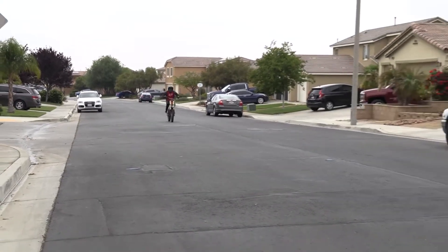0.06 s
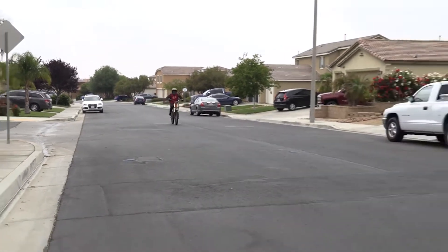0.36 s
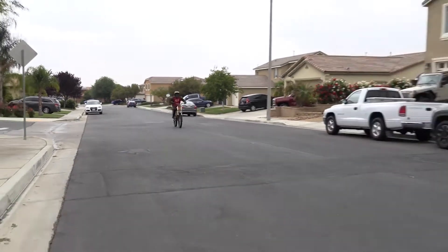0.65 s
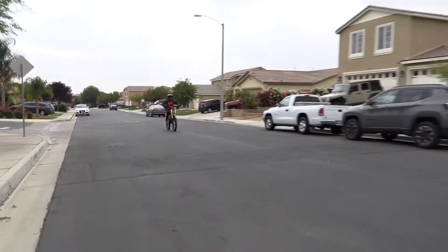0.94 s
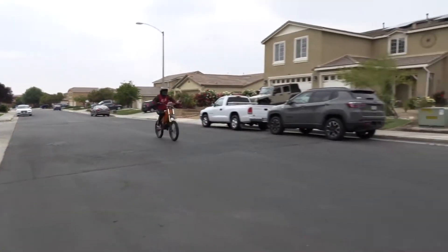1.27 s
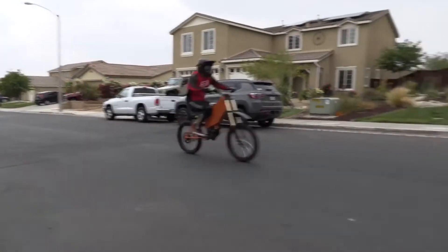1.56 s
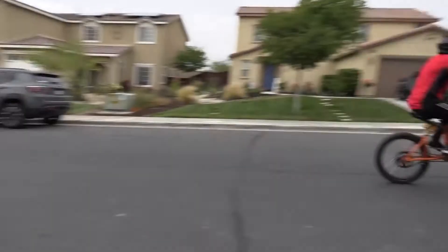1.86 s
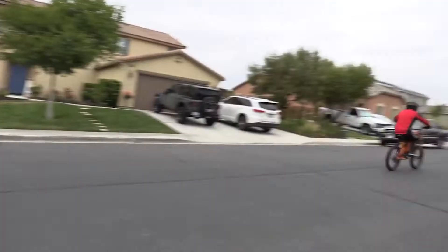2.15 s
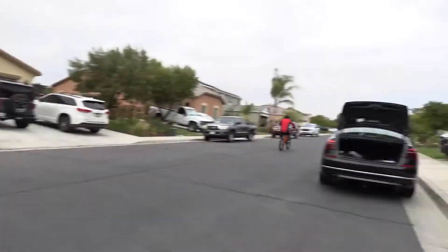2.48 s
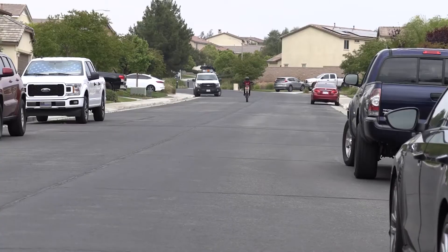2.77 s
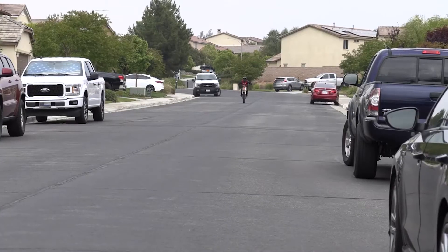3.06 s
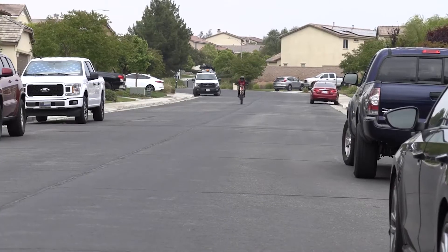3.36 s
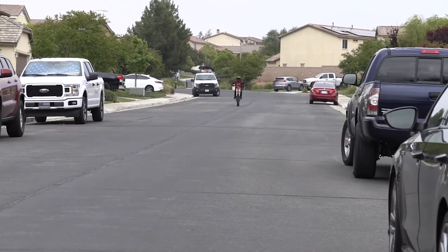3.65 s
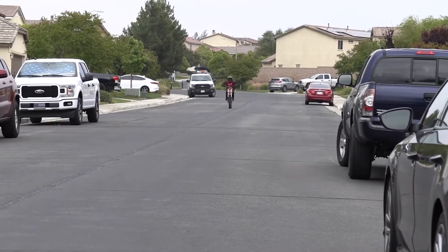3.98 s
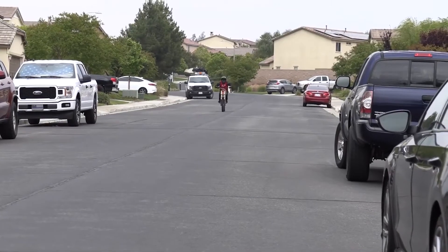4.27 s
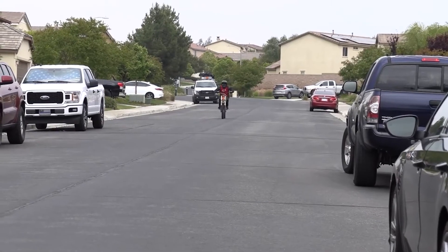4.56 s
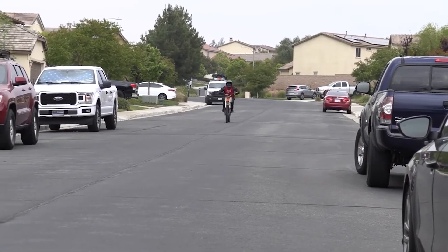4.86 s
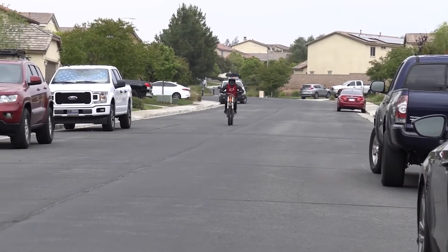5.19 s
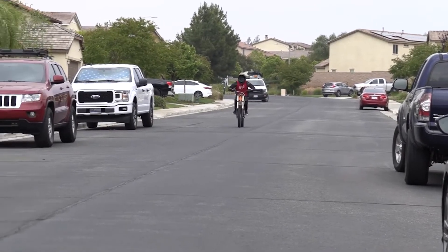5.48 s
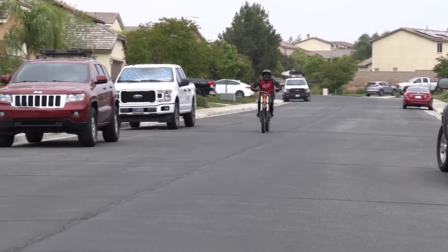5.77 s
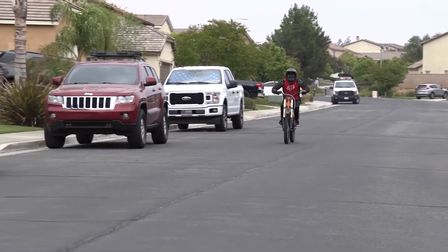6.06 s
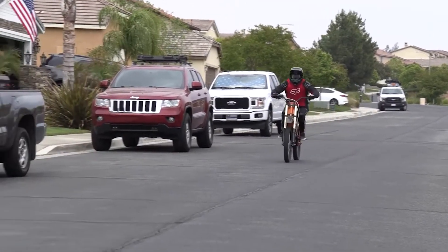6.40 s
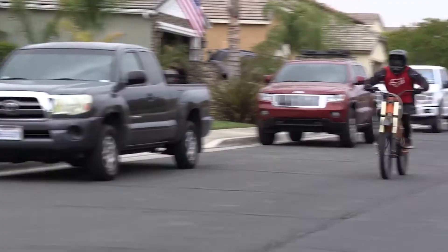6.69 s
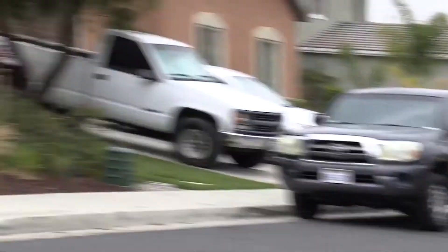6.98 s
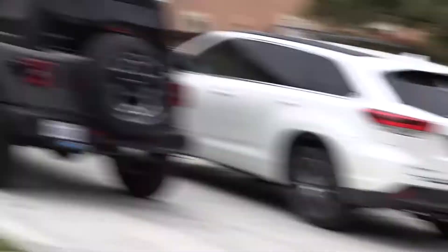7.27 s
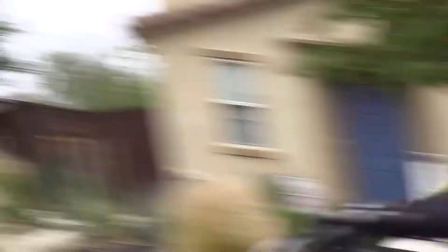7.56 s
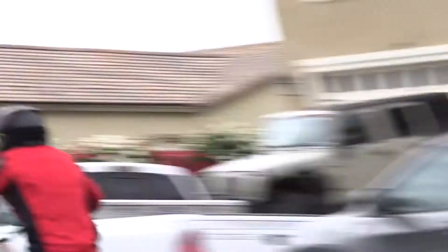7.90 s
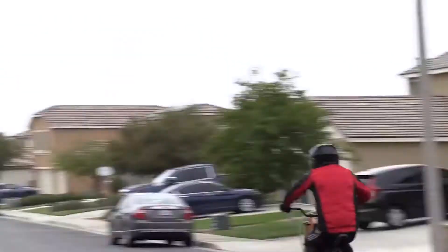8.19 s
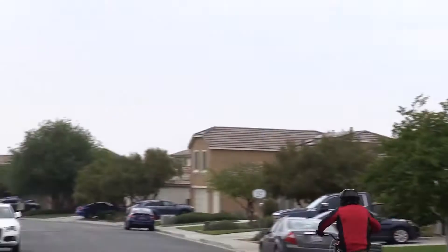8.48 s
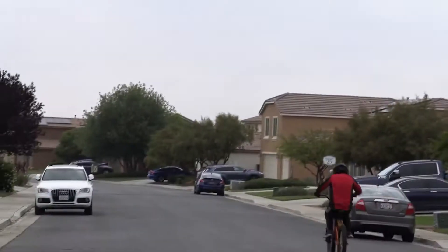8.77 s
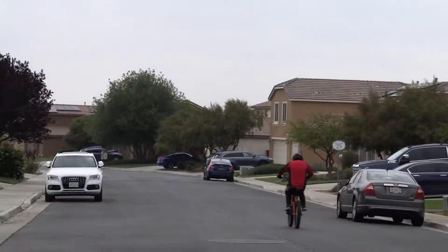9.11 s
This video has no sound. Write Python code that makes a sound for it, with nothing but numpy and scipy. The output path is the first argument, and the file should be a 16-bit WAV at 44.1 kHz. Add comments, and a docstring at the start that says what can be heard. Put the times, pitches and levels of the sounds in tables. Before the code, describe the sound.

An electric dirt bike passes twice on a quiet street, its motor whining, knobby tyres humming and chain drive whirring.

```python
"""Tyre hum and motor whine draw near: an electric dirt bike passes twice on a quiet street,
with a jump from the first pass to the second approach. Knobs slap the asphalt, grit hisses,
belt and chain teeth mesh and ring the frame; on coasting, the freewheel pawls buzz.
Tyre, drive and motor pitches follow one speed curve; the main levels follow the bike's position.
A little wind bumps the microphone."""
import sys
import numpy as np
from scipy import signal
from scipy.fft import rfft, irfft, next_fast_len
from scipy.io import wavfile
from scipy.ndimage import uniform_filter1d, map_coordinates

SR = 44100
rng = np.random.default_rng(int(sys.argv[2]) if len(sys.argv) > 2 else 0)


def write(x):
    x = np.atleast_2d(x).T
    wavfile.write(sys.argv[1], SR, np.round(np.clip(x, -1, 1) * 32767).astype(np.int16))


N = 407484
JUMP_S = 2.605
KNOBS_PER_PULLEY_TURN, WHINE_MULTIPLE = 18, 9

# Tyre knob rate, Doppler included. Each row: time in seconds, rate in Hz.
KNOB_RATE = [(0, 496.7), (.4, 527.2), (1.6, 585.8), (1.8, 563.5), (2.2, 529.8), (2.6, 505), (2.61, 485),
             (3, 514), (4, 560), (4.5, 584.7), (5, 625.6), (6.5, 668.8), (7.3, 704.7), (7.53, 690.6),
             (7.7, 626.6), (7.82, 600.3), (8, 574.2), (9.24, 528.7)]
# Rider's throttle. Each row: time in seconds, opening 0-1.
THROTTLE = [(0, 0.89), (1.6, 0.5), (1.85, 0.22), (2.15, 0.11), (2.6, 0.13), (2.61, 0.59), (7.4, 1),
            (7.72, 0.32), (7.95, 0.15), (9.24, 0)]
# The passes. Each row: time abreast in seconds, speed in m/s, closest distance in m, gain in dB,
# change in dB per m gone past, position of the brightest hiss in m past the microphone.
PASSES = [(1.76, 11, 3.6, 0.64, -0.18, -4.5), (7.63, 13.08, 3.1, 0.4, 0.1038, 6.5)]
# How sources carry. Each: gain abreast in dB, loss in dB per doubling of distance,
# loss in dB per m still to come, change in dB from behind.
HUM_REACH = (-22, 0, 0.58, -14.5)
MESH_REACH = (-24, 3.5, 0.5, -19)
WHINE_REACH = (-36.5, 10.5, 0.1, -11)
MOTOR_REACH = (-30, 2, 1.2, -15)
FREEWHEEL_REACH = (-22, 4, 0.3, -8)
WHIRR_REACH = (-25.5, 6.5, 0.24, -6)
ROAR_REACH = (-27, 0.75, 0.42, -7.5)
HISS_REACH = (-31.5, 5.5, 0.5, -11.5)
RUMBLE_REACH = (-32, 0.83, 0.34, -7)

# Tone families. Each row: knob-rate multiple, relative level in dB, width in Hz, coasting change in dB.
TREAD_LINES = [(.92, -14, 10, -6), (.96, -7.5, 8.8, -2.5), (1.0, -3.5, 7.8, -4), (1.02, -11, 8.5, 8),
               (1.04, -8.5, 6.1, 4.5), (1.07, -10, 11.6, 2.5), (1.095, -7.5, 8.3, 9.5), (1.13, -22, 53, 9)]
MESH_LINES = [(1.95, -10, 32, -5), (2.1, -2.5, 31, -2.5), (2.19, -1, 14.3, -4), (2.36, -8, 94, 12.5),
              (2.75, -10, 90, -2.5), (2.97, -6, 23, -12), (3.12, -5, 28, -11.5), (3.22, -6, 50, -5.5),
              (3.31, -6.5, 32, -1), (3.85, -9.5, 78, 5.5), (4.35, -9, 110, 11)]
MOTOR_LINES = [(4.4, -11.5, 50, -12), (5.7, -5, 30, -7), (6, -4.5, 43, -8.5), (6.7, -9, 29, -11),
               (7.7, -15.5, 130, 5), (12, -13.5, 97, -7)]
# Tones at speed under load. Each row: knob-rate multiple, level in dB re main whine, width in Hz.
STRAIN_LINES = [(2.22, 4, 22.6), (3.9, -4, 29.6), (4.42, -3, 33), (6, -2, 43), (12, -11, 91)]
# Radiation of frame and motor case. Each row: frequency in Hz, gain in dB.
FRAME_RESPONSE = [(900, 7), (1250, -1.5), (1480, -7.5), (1620, 4.5), (1745, 12), (1880, 3.5), (2080, -2.5),
                  (2300, 4.5), (2700, -4), (3400, -6.5), (3850, -9.5), (4180, 2), (4550, -19), (4900, 1.5),
                  (5650, 5), (6400, 2.5), (9000, -10)]
# Metal resonances. Each row: frequency in Hz, width in Hz, relative gain in dB.
FRAME_MODES = [(1732, 180, 3.5), (2360, 110, -13), (3050, 140, -21), (4160, 140, -24), (5280, 180, -18),
               (5880, 160, -28)]
FREEWHEEL_MODES = [(3537, 63, -1.5), (3910, 140, -3.5), (4565, 92, -1), (4815, 48, 4), (5280, 93, -7.5),
                   (6320, 150, -10.5), (7020, 140, -6), (7780, 150, -13), (9000, 96, -14),
                   (11500, 280.2, -28)]
# Noise colours. Each row: frequency in Hz, relative density in dB.
WHIRR_SPECTRUM = [(1500, -30), (2100, 6), (2400, -0.5), (2700, 2), (2930, 0), (3400, -1), (4100, -1.5),
                  (4450, -1.5), (5200, -4.5), (5650, -3), (7200, -21), (8600, -36), (12000, -29),
                  (15000, -60)]
ROAR_SPECTRUM = [(40, -60), (330, -25.5), (480, -1.5), (620, 7.5), (800, -1), (1000, 1), (1350, -1.5),
                 (1500, -3.5), (1650, -3), (1920, -2.5), (2100, -7.5), (2500, -8), (3200, -22), (5000, -52),
                 (15000, -70)]
HISS_SPECTRUM = [(4000, -16), (6500, 0.5), (8000, -2), (10000, -1.5), (12000, -8.5), (14000, -16.5),
                 (15500, -37)]
RUMBLE_SPECTRUM = [(25, -46), (50, -24), (80, -11), (120, -3.5), (260, -2), (350, -10), (500, 0), (800, -6),
                   (1500, -50)]
STREET_SPECTRUM = [(25, -27), (60, -8.5), (110, -5.5), (250, -11.5), (350, -3), (600, -10), (850, -2.5),
                   (1020, -4), (1400, -10.5), (2100, -31), (2450, -27), (3200, -31), (5600, -33),
                   (6050, -30), (6500, -34), (12000, -48), (15000, -70)]

# Swells and dips of hum, chain load and whine. Each row: centre in seconds, gain in dB, sigma in seconds.
HUM_SWELLS = [(.72, -2.5, 0.066), (.84, 5, 0.011), (1.97, -6, 0.13), (2.3, 2.5, 0.13), (4.4, -0.5, 0.26),
              (5.45, 3.5, 0.33), (6.4, 5, 0.39), (7.48, 4, .04), (8.62, 1, 0.12), (9.05, -15, 0.057)]
LOAD_SWELLS = [(.15, -3.5, 0.28), (.66, -5, 0.17), (1.3, -0.5, 0.066), (3.97, -19, 0.034), (4.4, -1, .17),
               (5.27, 2.5, 0.05), (6.45, 3.5, 0.13), (6.6, -1.5, 0.032), (7.0, 2.5, 0.11),
               (7.38, -2.5, 0.041), (7.7, -2.5, 0.045)]
WHINE_FLARES = [(.45, 5, 0.11), (.82, 5, 0.02), (.93, 6, 0.037), (1.23, 8, 0.027), (1.5, 6, .03),
                (1.68, 12, 0.05), (2.2, 16, 0.037), (3.5, 4, 0.15), (7.42, -3, 0.08)]
# A tyre sings on smooth asphalt; a gear note bites.
# Each row: centre in seconds, peak in dB, sigma in seconds, knob-rate multiple, width in Hz.
TYRE_NOTES = [(.3, -35.5, 0.14, 1.075, 4), (.76, -28, 0.069, 1.085, 9), (1.98, -21, 0.089, 1.095, 5.3),
              (2.21, -24.5, 0.046, 1.06, 6.8), (2.35, -27, 0.068, 1.075, 6.6), (3.5, -49, 0.26, 1.1, 3),
              (4.08, -47, 0.14, 1.015, 3.2), (4.65, -44, 0.1, 1.11, 3), (5.2, -38, 0.12, 1.1, 5.2),
              (5.65, -31.5, 0.16, 1.02, 6.65), (7.2, -30.5, 0.17, 1.0, 7.7), (8.65, -37, 0.22, 1.0, 15)]
GEAR_NOTES = [(.55, -43, 0.14, 10, 50), (.65, -42, 0.24, 4.35, 28), (.8, -51, 0.38, 5.7, 39),
              (1.1, -48, 0.33, 11.85, 54), (1.25, -39, .15, 4.1, 32), (1.25, -50, 0.11, 4.3, 30),
              (1.25, -43, 0.16, 4.9, 40), (1.25, -41, .13, 5.35, 30), (1.28, -41, 0.071, 5.85, 25),
              (1.3, -34, .17, 3.25, 33), (1.62, -35, 0.041, 4.52, 30), (1.85, -27, 0.056, 2.2, 22),
              (2.25, -55, 0.15, 6.8, 27), (2.33, -41, 0.2, 2.14, 16), (2.37, -42, 0.1, 10.1, 35),
              (3.05, -71, 0.17, 11.75, 49), (3.55, -67, .18, 11.95, 54), (3.5, -66, .17, 9.05, 60),
              (3.65, -53.5, 0.26, 3.1, 30), (4.45, -48, .22, 2.98, 20), (5.3, -48, 0.091, 2.72, 20),
              (4.5, -70, .3, 9, 56), (4.55, -66, .09, 6, 30), (4.7, -52, .3, 2.2, 18.5),
              (4.85, -67, .11, 6.78, 25), (4.9, -59, .09, 3.92, 22), (5.0, -68, .17, 8.85, 55),
              (5.3, -59, 0.08, 6.55, 25.7), (5.75, -54.5, 0.28, 5.9, 60), (6.05, -45, 0.058, 2.24, 14.7),
              (6.4, -55, .12, 14.8, 220), (6.45, -35.5, 0.077, 3.31, 27), (6.78, -32.5, .06, 3.25, 23),
              (7.15, -52, 0.37, 14.8, 200), (7.2, -38, 0.22, 3.9, 27.8), (7.2, -38.5, 0.21, 4.42, 28),
              (7.25, -44, 0.21, 6, 69), (7.05, -49, 0.24, 7.7, 50), (6.4, -52, 0.11, 12, 60),
              (7.2, -38.5, .2, 11.95, 51), (7.3, -30, 0.18, 3.3, 29.4), (7.49, -33, 0.061, 3.34, 23),
              (7.56, -28, 0.066, 2.24, 11)]
# Frame ringing; belt note before its coasting loss. Each row: time in seconds, level in dB.
RING_LEVEL = [(0, -44), (.45, -39), (.55, -32.5), (.83, -34), (.95, -37), (1.3, -44), (1.65, -27.5),
              (1.9, -28.5), (2.15, -48), (2.6, -58), (2.61, -59), (3.15, -62), (3.4, -58), (3.8, -54),
              (3.95, -67), (4.15, -49.5), (4.6, -53), (4.9, -48.5), (5.28, -45), (5.7, -46), (6.4, -38),
              (7.4, -37), (7.9, -57.5)]
BELT_LEVEL = [(0, -41.5), (.82, -31.5), (1.25, -33.5), (1.45, -37), (1.8, -25.5), (2.6, -48), (4.1, -51),
              (6.5, -34.5), (7.25, -38.5), (7.5, -26.5), (7.6, -25), (8.1, -47), (9.24, -62)]
# Chain hits on the guide. Each row: start in seconds, level in dB, share that rings the frame 0-1.
CHAIN_SLAPS = [(.402, -29, 0.1), (0.424, -25, 0), (.474, -24.5, 0.2), (0.522, -22, 0.8), (.551, -25, 0.6),
               (0.585, -21.5, 0.8), (.612, -27, 0.9), (.641, -25, 0.8), (0.671, -24, 1), (0.701, -21, 1),
               (0.733, -29, 1), (0.788, -21.5, 1), (.814, -23, 1)]
# Slack chain singing in its guide. Each row: time in seconds, pitch in Hz, level in dB.
CHAIN_NOTE = [(7.55, 2100, -80), (7.64, 2040, -33), (7.72, 2050, -26), (7.8, 2018, -30),
              (7.89, 1980, -27.5), (7.97, 1967, -42), (8.5, 1955, -44.5), (9.24, 1920, -47)]
# Noise bursts of wind, chain and road. Each row: centre in seconds, peak in dB, sigma in seconds.
WIND_PUFFS = [(1.14, -34, 0.02), (1.22, -43, 0.047), (1.307, -42, 0.034), (2.419, -60, 0.019),
              (2.591, -45, 0.024), (4.096, -44, 0.016), (4.43, -55, 0.021), (4.641, -48, 0.041),
              (7.547, -40.5, 0.12), (7.759, -40.5, 0.051)]
CHAIN_SCRAPES = [(7.735, -22.5, 0.021), (7.81, -25, 0.02), (8.04, -28, 0.039), (8.26, -35, 0.015)]
ROUGH_PATCH = [(9.16, -29.5, 0.014), (9.21, -30.5, 0.024)]


def from_db(db):
    return 10 ** (np.asarray(db) / 20)


def unit_rms(x):
    return x / np.sqrt(np.mean(np.abs(x) ** 2) + 1e-20)


def curves(rows):
    """Each column after the time, interpolated per sample."""
    times_s, *columns = np.transpose(rows)
    return [np.interp(np.arange(N) / SR, times_s, column) for column in columns]


def db_at(spectrum, hz):
    """A spectrum read on a log-frequency axis."""
    known_hz, db = np.transpose(spectrum)
    return np.interp(np.log(hz), np.log(known_hz), db)


def bumps(rows):
    """Sum of Gaussian bells."""
    t = np.arange(N) / SR
    bells = sum(height * np.exp(-0.5 * ((t[::20] - s) / sigma_s) ** 2) for s, height, sigma_s in rows)
    return np.interp(t, t[::20], bells)


def swells(rows):
    """Linear gain from bells with peaks in dB."""
    return bumps([(s, from_db(db), sigma_s) for s, db, sigma_s in rows])


def drift(rate_hz, size=N):
    """Slow random wander of rms about 1, drawn every 20th sample."""
    pole = np.exp(-40 * np.pi * rate_hz / SR)
    white = rng.standard_normal(size // 20 + 4002)
    slow = unit_rms(signal.lfilter([1], [1, -2 * pole, pole * pole], white)[4000:]).astype("f4")
    ramp = np.arange(20, dtype="f4") / 20
    return (slow[:-1, None] + np.diff(slow)[:, None] * ramp).ravel()[:size]


def noise(spectrum):
    """Coloured noise, rms 1."""
    size = next_fast_len(N)
    hz = np.maximum(np.fft.rfftfreq(size, 1 / SR), 1)
    shaped = rfft(rng.standard_normal(size)) * from_db(db_at(spectrum, hz))
    return unit_rms(irfft(shaped, size)[:N])


def gritty(spectrum, grit_db):
    """Noise fluttering with road grain and chain shake."""
    return unit_rms(noise(spectrum) * from_db(grit_db * drift(24)))


def resonate(x, hz, width_hz):
    """One resonance, peak gain 1."""
    r = np.exp(-np.pi * width_hz / SR)
    feedback = [1, -2 * r * np.cos(2 * np.pi * hz / SR), r * r]
    return signal.lfilter(np.array([1, 0, -1]) * (1 - r * r) / 2, feedback, x)


def line(phase, width_hz, steady):
    """A tone of rms 1: a steady part plus scatter from uneven teeth and many paths."""
    in_phase = steady + drift(width_hz, len(phase))
    quadrature = drift(width_hz, len(phase))
    return (in_phase * np.cos(phase) + quadrature * np.sin(phase)) / np.sqrt(1 + steady ** 2 / 2)


def lines(rows, phase, knob_hz, coasting, steady, response=((20, 0), (20000, 0))):
    """Wheel-locked tones coloured by what radiates them; total power 1."""
    tones, power = 0, 0
    for multiple, db, width_hz, coast_db in rows:
        level_db = db + coast_db * coasting[::20] + db_at(response, multiple * knob_hz[::20])
        gain = np.repeat(from_db(level_db), 20)[:N]
        tones += gain * line(multiple * phase, width_hz, steady)
        power += gain ** 2
    return tones / np.sqrt(power)


def notes(rows, phase, steady):
    """Wheel-locked tones, one Gaussian swell each."""
    out = np.zeros(N)
    for (s, db, sigma_s, multiple, width_hz), turn in zip(rows, rng.random(len(rows))):
        at = np.arange(max(int((s - 0.8) * SR), 0), min(int((s + 0.8) * SR), N))
        swell = from_db(db) * np.exp(-0.5 * ((at / SR - s) / sigma_s) ** 2)
        out[at] += swell * line(multiple * phase[at] + 2 * np.pi * turn, width_hz, steady)
    return out


def ride(bright_span_m=1.8, near_m=6.17):
    """Two straight passes: gain for a reach, speed away, side-on share and hiss brightness."""
    t = np.arange(N) / SR
    current_pass = np.array(PASSES)[(t >= JUMP_S).astype(int)]
    abreast_s, speed_m_s, closest_m, base_db, db_per_m, brightest_m = current_pass.T
    past_m = speed_m_s * (t - abreast_s)
    receding = past_m / np.hypot(past_m, closest_m)
    pass_db = base_db + db_per_m * np.maximum(past_m, 0)
    doublings = np.log2(np.hypot(past_m, near_m) / near_m)
    to_come_m = np.maximum(-past_m, 0)
    behind = np.maximum(receding, 0) ** 2.08
    side_on = (1 - receding ** 2) ** 2
    brightness = (bright_span_m / np.hypot(past_m - brightest_m, bright_span_m)) ** 0.47

    def gain(reach):
        """One source's gain, eased across the jump."""
        db, doubling_db, metre_db, behind_db = reach
        level_db = pass_db + db - doubling_db * doublings - metre_db * to_come_m + behind_db * behind
        return from_db(uniform_filter1d(level_db, size=440))
    return gain, speed_m_s * receding, side_on, np.clip(brightness, 0.25, 1)


def tyre_hum(phase, knob_hz, coasting):
    """Uneven knobs slap the asphalt; coasting roughens the hum and adds the rear tyre's near-octave."""
    swell = from_db(bumps(HUM_SWELLS) + 1.23 * drift(4.2))
    hum = lines(TREAD_LINES, phase, knob_hz, coasting, steady=1.08 * (1 - 1.18 * coasting))
    local_power = np.abs(uniform_filter1d(hum ** 2, size=3500)) + 1e-6
    hum = unit_rms(hum / local_power ** 0.38)  # evens out slow beats
    flutter = 1 + 0.12 * coasting * drift(27)
    overtone = coasting * from_db(-14) * line(2.17 * phase, width_hz=19, steady=0.94)
    return swell * (hum * flutter + overtone)


def throb(phase, depth=0.039):
    """Chain tension swings once per pulley turn."""
    return 1 + depth * np.sin(phase / KNOBS_PER_PULLEY_TURN)


def tooth_mesh(phase, knob_hz, coasting):
    """Chain and belt teeth mesh and sound through the frame."""
    teeth = lines(MESH_LINES, phase, knob_hz, coasting, steady=0.67, response=FRAME_RESPONSE)
    return teeth * throb(phase)


def belt(phase, coasting, slack_db=-7):
    """The toothed belt sings one note, quieter when slack."""
    db, = curves(BELT_LEVEL)
    return from_db(db + slack_db * coasting) * line(1.355 * phase, width_hz=25, steady=0.85)


def rotor_wobble(phase, knob_hz, bounce_hz=550, span_hz=20):
    """The springy belt swings the rotor phase per pulley turn, most at its bounce speed, and at random."""
    depth_rad = 0.19 + 0.18 / (1 + ((knob_hz - bounce_hz) / span_hz) ** 2)
    swing_rad = depth_rad * np.sin(phase / KNOBS_PER_PULLEY_TURN + drift(6.5))
    return phase + swing_rad + 0.29 * drift(13.6)


def whine_lift(knob_hz, coasting, case_hz=4940, top_speed_hz=705):
    """Whine gain: up at a motor case resonance, at top speed and in timed flares; down when coasting."""
    case_db = 10 / (1 + ((WHINE_MULTIPLE * knob_hz - case_hz) / 90) ** 2)
    top_db = 5 / (1 + ((knob_hz - top_speed_hz) / 25) ** 2)
    return from_db(case_db + top_db + bumps(WHINE_FLARES) - 4.3 * coasting)


def main_whine(phase, knob_hz, coasting, load, onset_hz=575, span_hz=60):
    """The main motor line: wavering strands at low speed; under strain they fade and other tones sing."""
    strain = np.clip((knob_hz - onset_hz) / span_hz, 0, 1) * (1 - coasting)
    strands = line(8.8 * phase, width_hz=45, steady=0.4) + line(9.15 * phase, width_hz=50, steady=0.4)
    spread = 0.75 * (1 - 1.1 * strain)
    centre = line(WHINE_MULTIPLE * phase, width_hz=18.5, steady=0.22)
    core = (centre + spread * strands) / np.sqrt(1 + 2 * spread ** 2)
    singing = sum(from_db(db) * line(multiple * phase, width_hz, steady=0.5)
                  for multiple, db, width_hz in STRAIN_LINES)
    return core + load * strain * singing


def motor_overtones(phase, knob_hz, coasting, swell_db=0.9):
    """Thin motor tones, swelling and fading a little."""
    tones = lines(MOTOR_LINES, phase, knob_hz, coasting, steady=0.93, response=FRAME_RESPONSE)
    return tones * from_db(swell_db * drift(2.5))


def frame_ring(phase):
    """The loaded chain rattles the frame's modes in step with its tension."""
    db, = curves(RING_LEVEL)
    rattle = rng.standard_normal(N) * throb(phase)
    modes = sum(from_db(mode_db) * resonate(resonate(rattle, hz, width_hz), hz, width_hz)
                for hz, width_hz, mode_db in FRAME_MODES)
    return from_db(db) * unit_rms(modes)


def tyre_roar(side_on, whoosh_db=2):
    """Tread noise on the road, louder side-on."""
    return from_db(whoosh_db * side_on) * gritty(ROAR_SPECTRUM, grit_db=1.35)


def tread_hiss(brightness, far_cut_hz=9000):
    """Grit and spray off the tread; air dulls it with distance."""
    bright = gritty(HISS_SPECTRUM, grit_db=1.9)
    lowpass = signal.butter(4, far_cut_hz, fs=SR, output="sos")
    dull = unit_rms(signal.sosfilt(lowpass, gritty(HISS_SPECTRUM, grit_db=2.5)))
    return dull * np.sqrt(1 - brightness ** 2) + bright * brightness


def air_rumble(knob_hz, unity_hz=606):
    """Air rumble grows with speed."""
    return (knob_hz / unity_hz) ** 1.5 * noise(RUMBLE_SPECTRUM)


def chain_slaps(rise_s=0.0027, ring_hz=1750):
    """The slack chain hits its guide: dry rattles, then knocks that ring the frame."""
    t = np.arange(2600) / SR
    blow = t / rise_s * np.exp(1 - t / rise_s)
    rattle = noise([(900, -43), (1500, 1), (2100, 0), (2600, -1), (3300, -6), (4000, -15),
                    (9000, -34), (15000, -65)])
    out = np.zeros(N)
    for (s, db, share), turn in zip(CHAIN_SLAPS, rng.random(len(CHAIN_SLAPS))):
        at = int(s * SR) + np.arange(len(t))
        ring = np.sqrt(2) * np.sin(2 * np.pi * (ring_hz * t + turn))
        out[at] += from_db(db) * blow * (np.sqrt(share) * ring + np.sqrt(1 - share) * rattle[at])
    return out


def gust_thump(start_s=1.128, db=-24, hz=112, rise_s=0.0096):
    """The strongest gust shoves the microphone: one short low swing."""
    t = np.maximum(np.arange(N) / SR - start_s, 0)
    return from_db(db) * t / rise_s * np.exp(1 - t / rise_s) * np.sin(2 * np.pi * hz * t)


def wind_puffs():
    """Short low puffs on the microphone."""
    spectrum = [(25, -56), (55, -14), (105, -8.5), (160, -12.5), (260, -16), (600, -55), (2000, -90)]
    return swells(WIND_PUFFS) * noise(spectrum)


def freewheel(phase, away_m_s, clicks_per_knob=0.9, cruise_m_s=12):
    """Pawls drop over ratchet teeth and ring the steel; the ring wavers and sinks by Doppler shift."""
    tooth = np.floor(clicks_per_knob * phase / (2 * np.pi) + 0.5 * drift(150))
    drops = np.diff(tooth, prepend=0) > 0
    steel = np.zeros(N)
    for hz, width_hz, db in FREEWHEEL_MODES:
        clicks = drops * rng.choice([-1, 1], N) * (1 + 0.32 * drift(34))
        steel += from_db(db) * resonate(clicks + 1e-18, hz, width_hz)
    doppler = 1 - (away_m_s - cruise_m_s) / 343
    read_at = np.cumsum(doppler + 0.005 * drift(9)) % (N - 1)
    return unit_rms(map_coordinates(steel, [read_at], order=3))


def chain_note():
    """The slackening chain sings one falling note in its guide."""
    hz, db = curves(CHAIN_NOTE)
    return from_db(db) * line(2 * np.pi * np.cumsum(hz) / SR, width_hz=44, steady=0.96)


def chain_scrapes():
    """Bright chain rasps as the throttle closes."""
    spectrum = [(2500, -25), (3700, -7), (4450, 3), (4950, -2), (5600, -19), (7200, -13),
                (10000, -17), (15000, -43)]
    return swells(CHAIN_SCRAPES) * gritty(spectrum, grit_db=3)


def rough_patch(hz=517, width_hz=90):
    """The tyres growl briefly over rougher road."""
    band = resonate(rng.standard_normal(N), hz, width_hz)
    return swells(ROUGH_PATCH) * unit_rms(resonate(band, hz, width_hz))


def scene(street_db=-48.5):
    """Speed, throttle and position drive the running sounds; timed events and street noise add on."""
    knob_hz, = curves(KNOB_RATE)
    throttle, = curves(THROTTLE)
    coasting = np.clip(1 - throttle / 0.97, 0, 1)
    load = from_db(bumps(LOAD_SWELLS))
    gain, away_m_s, side_on, brightness = ride()
    phase = 2 * np.pi * np.cumsum(knob_hz) / SR
    rotor_phase = rotor_wobble(phase, knob_hz)

    mix = gain(HUM_REACH) * tyre_hum(phase, knob_hz, coasting)
    mix += notes(TYRE_NOTES, phase, steady=3.1) + rough_patch()
    mix += gain(MESH_REACH) * load * tooth_mesh(phase, knob_hz, coasting)
    mix += notes(GEAR_NOTES, rotor_phase, steady=1)
    mix += chain_note() + chain_slaps() + chain_scrapes() + belt(phase, coasting)
    whine = main_whine(rotor_phase, knob_hz, coasting, load)
    mix += gain(WHINE_REACH) * whine_lift(knob_hz, coasting) * whine
    mix += gain(MOTOR_REACH) * (0.5 + throttle) * motor_overtones(rotor_phase, knob_hz, coasting)
    mix += gain(FREEWHEEL_REACH) * coasting ** 2 * freewheel(phase, away_m_s)
    mix += gain(WHIRR_REACH) * from_db(-4.5 * coasting) * gritty(WHIRR_SPECTRUM, grit_db=1)
    mix += gain(ROAR_REACH) * tyre_roar(side_on)
    mix += gain(HISS_REACH) * tread_hiss(brightness)
    mix += gain(RUMBLE_REACH) * air_rumble(knob_hz)
    mix += gust_thump() + wind_puffs() + from_db(street_db) * noise(STREET_SPECTRUM)
    mix += frame_ring(phase)
    return mix[None]


def record(dry):
    """A 100-sample fade-in and a steep low-pass."""
    cutoff_hz = 15200
    fade_in = np.minimum(np.arange(N) / 100, 1)
    return signal.sosfilt(signal.ellip(10, 0.2, 80, cutoff_hz, fs=SR, output="sos"), dry * fade_in)


dry = scene()
out = record(dry)
write(out)
```